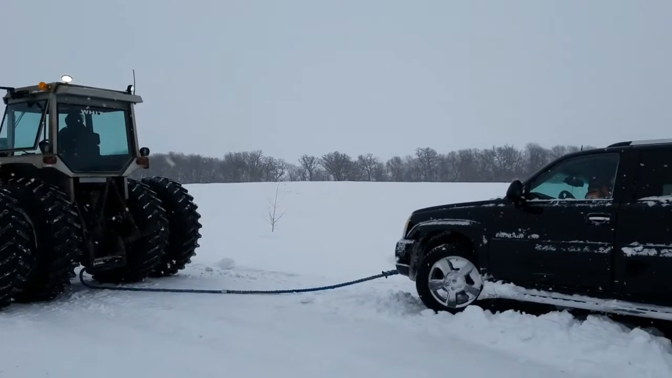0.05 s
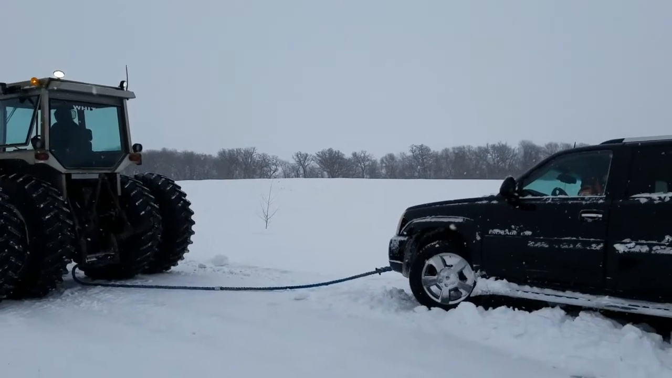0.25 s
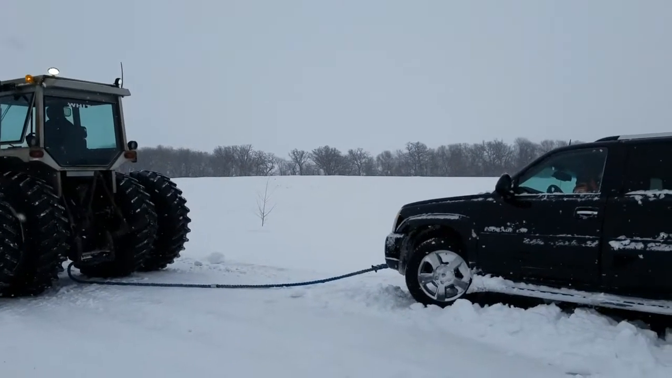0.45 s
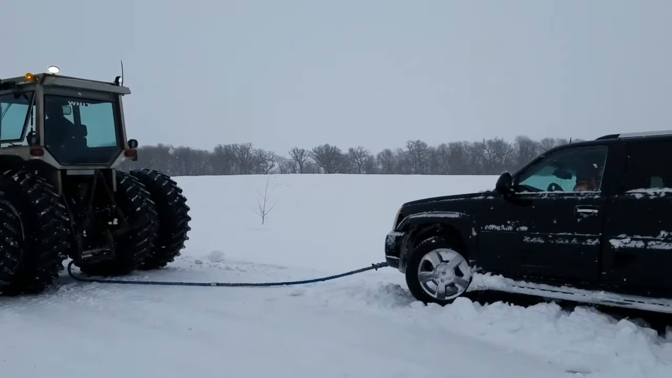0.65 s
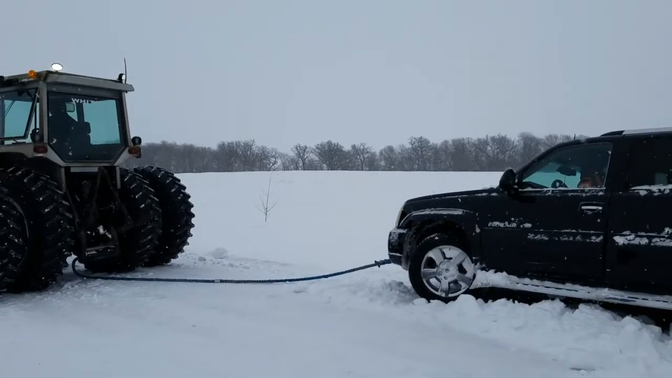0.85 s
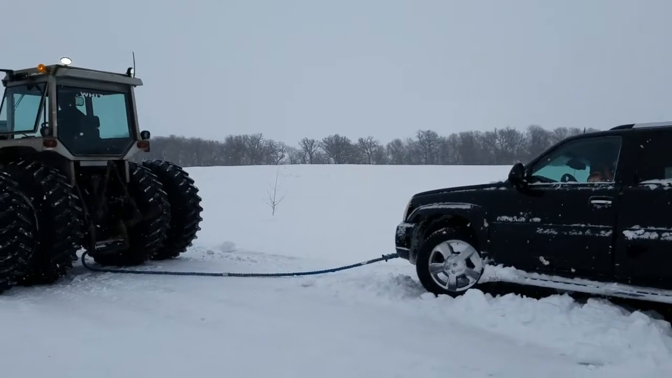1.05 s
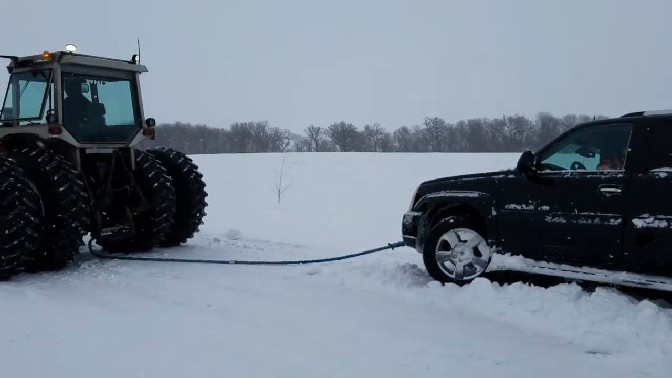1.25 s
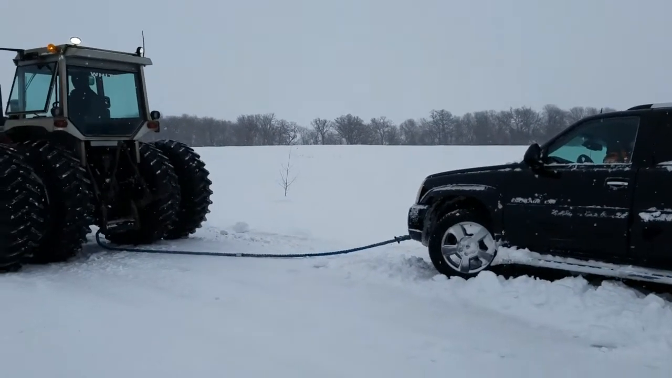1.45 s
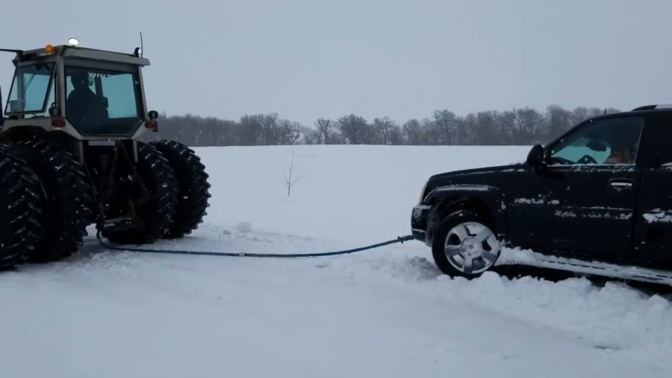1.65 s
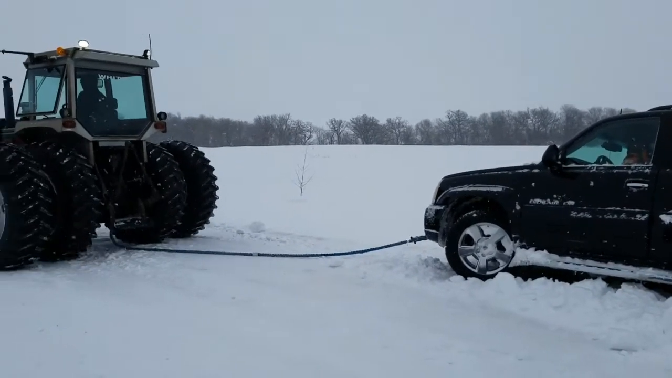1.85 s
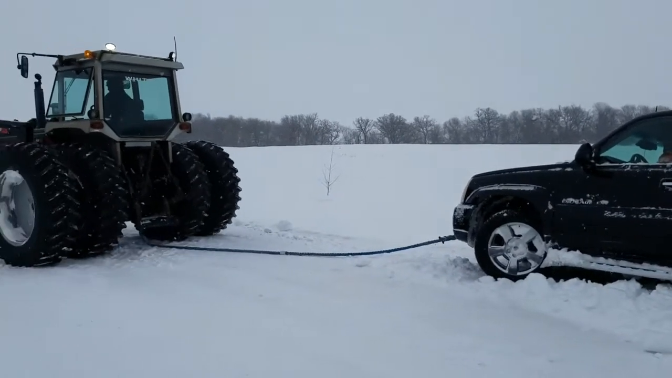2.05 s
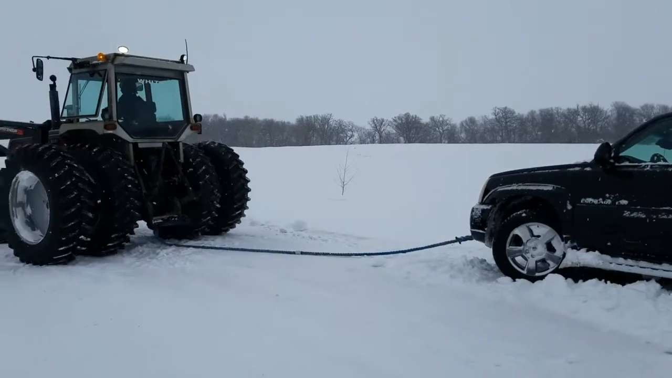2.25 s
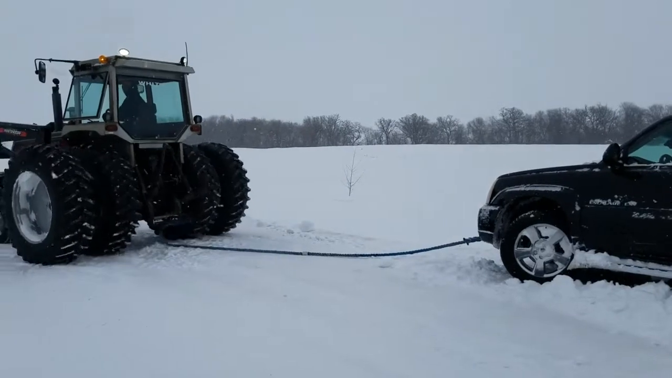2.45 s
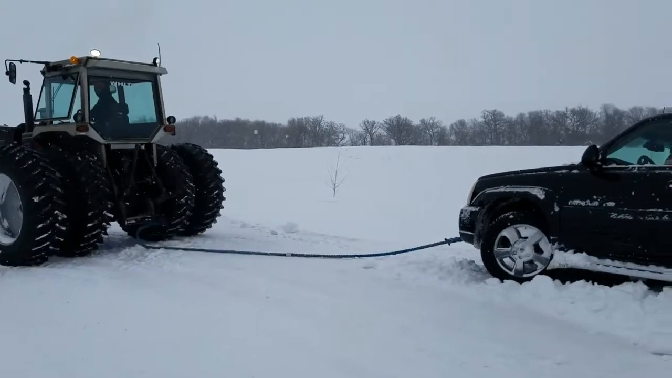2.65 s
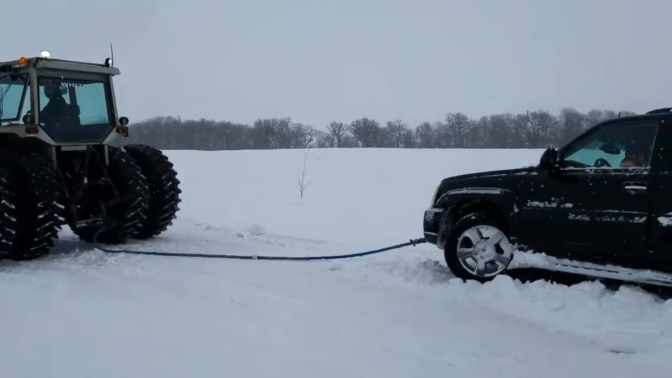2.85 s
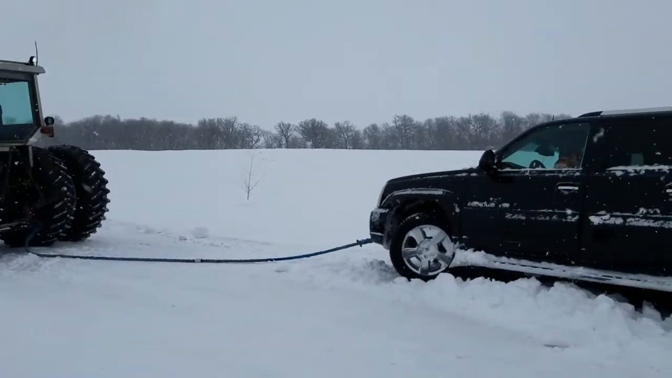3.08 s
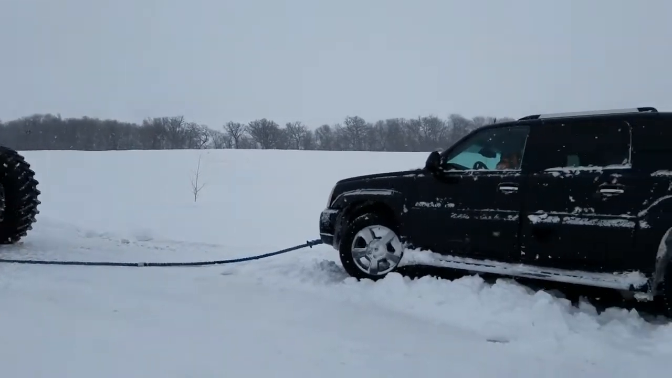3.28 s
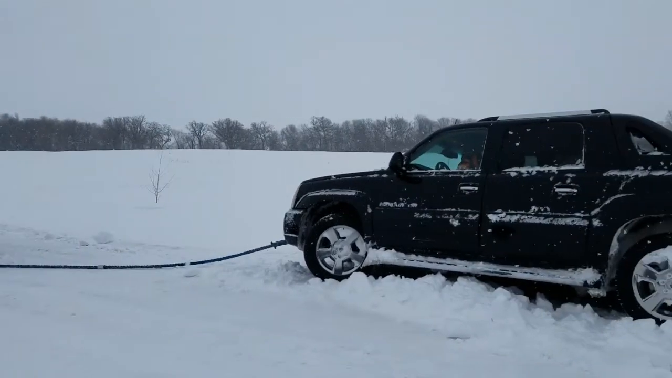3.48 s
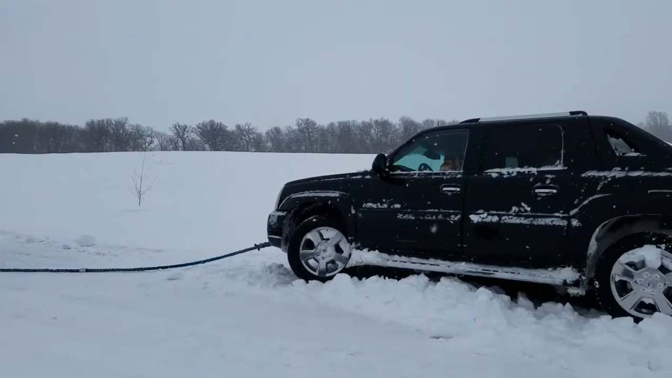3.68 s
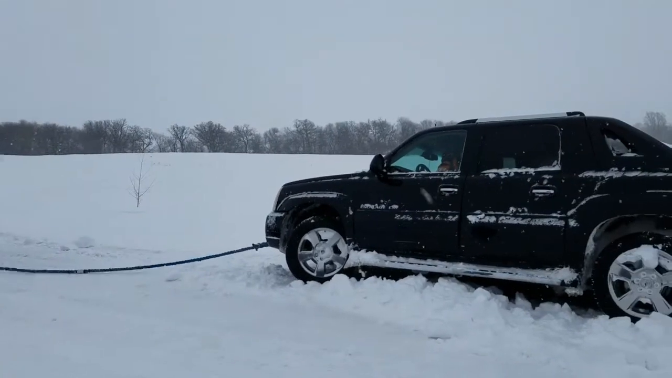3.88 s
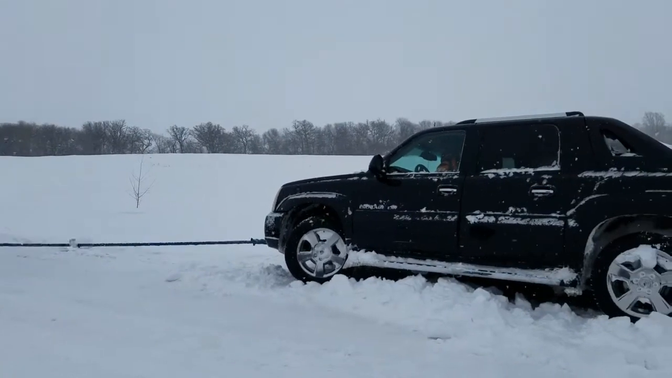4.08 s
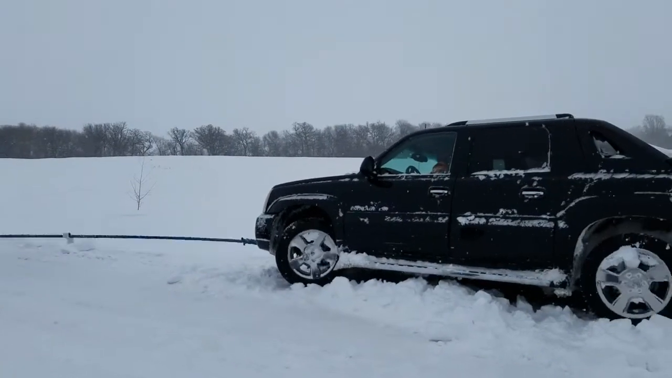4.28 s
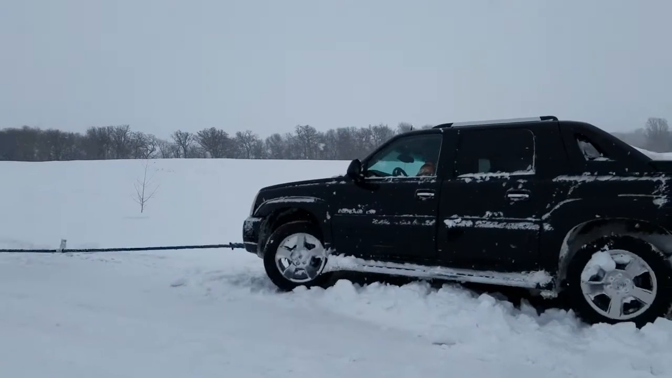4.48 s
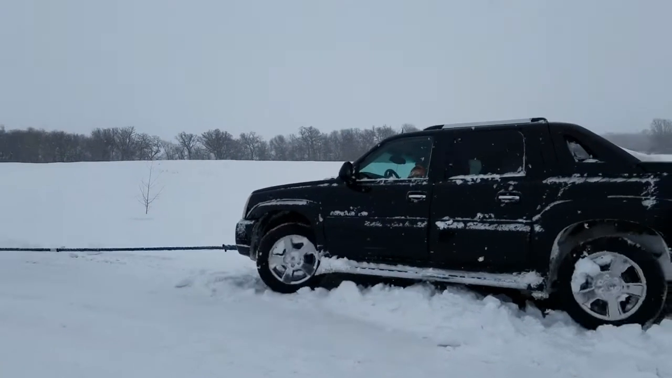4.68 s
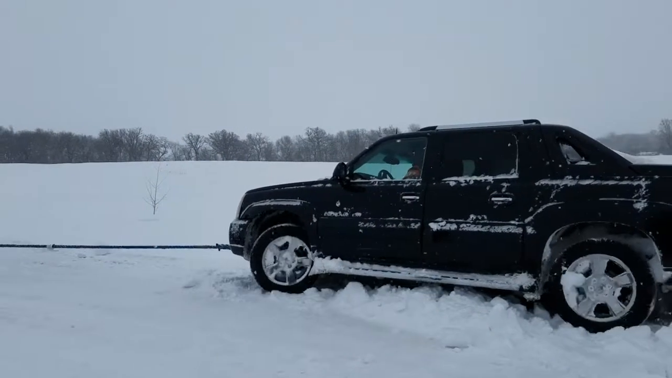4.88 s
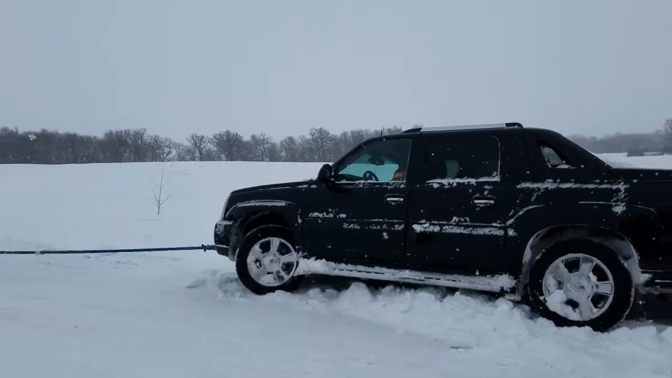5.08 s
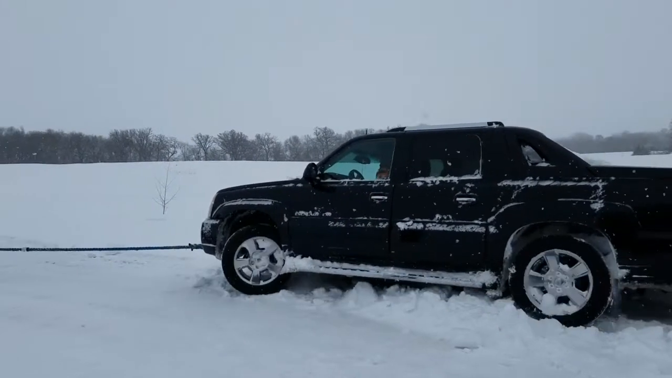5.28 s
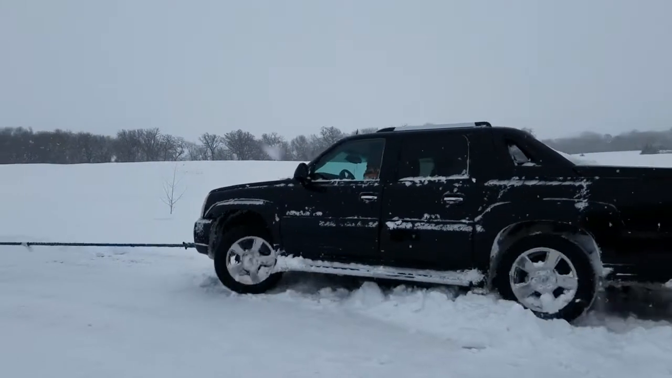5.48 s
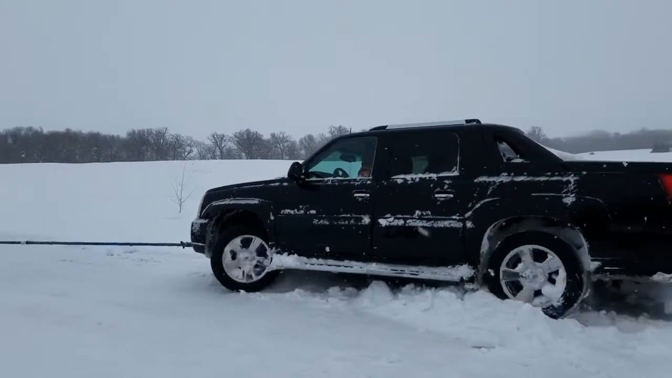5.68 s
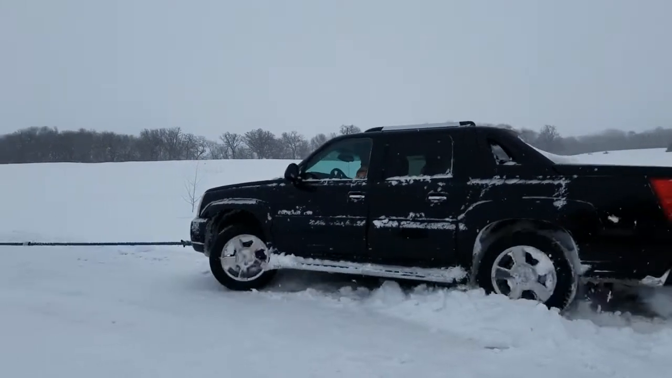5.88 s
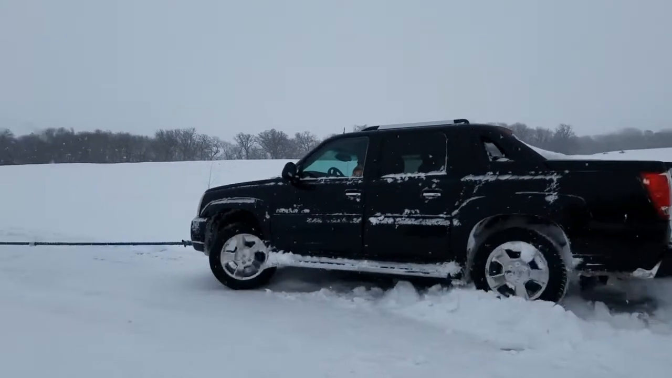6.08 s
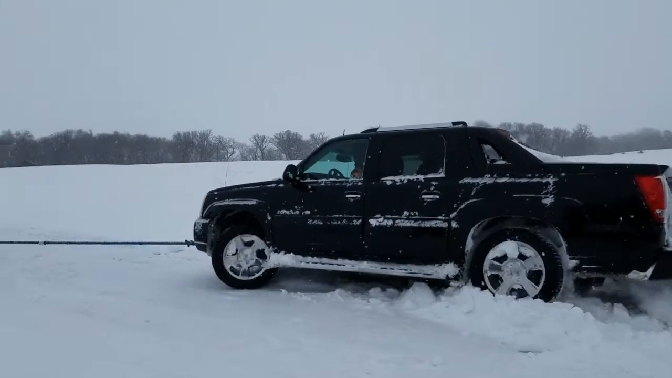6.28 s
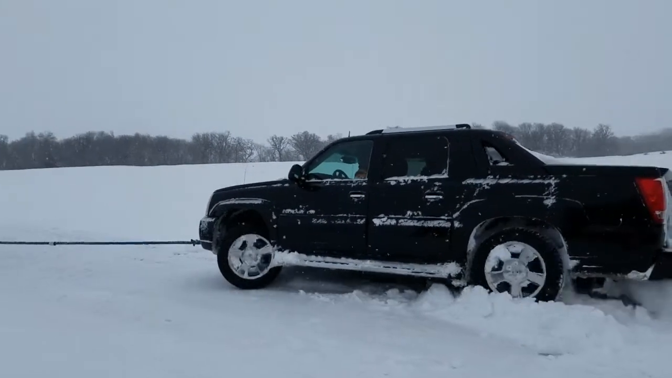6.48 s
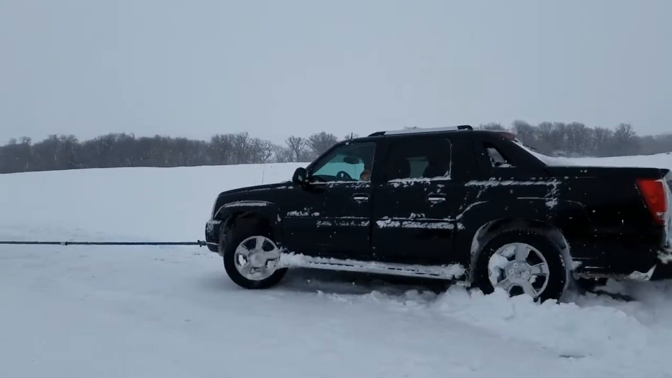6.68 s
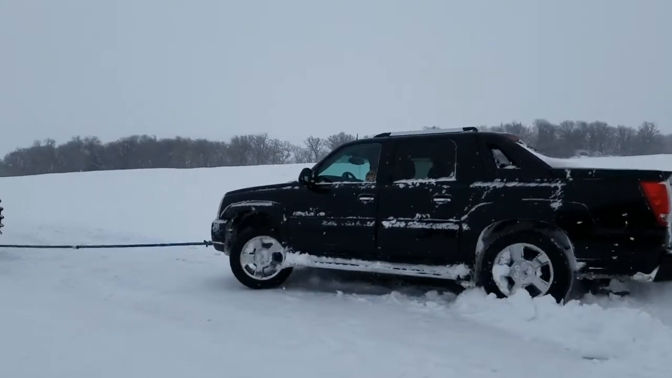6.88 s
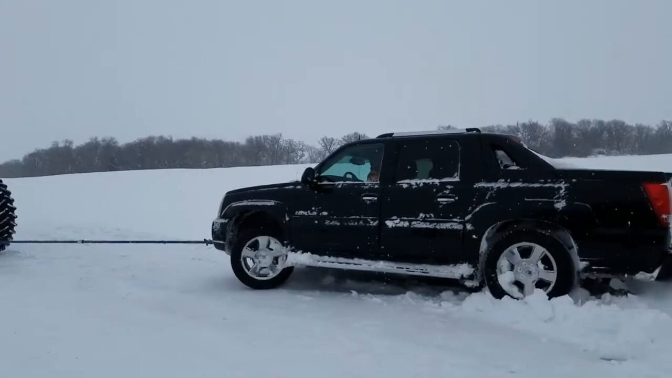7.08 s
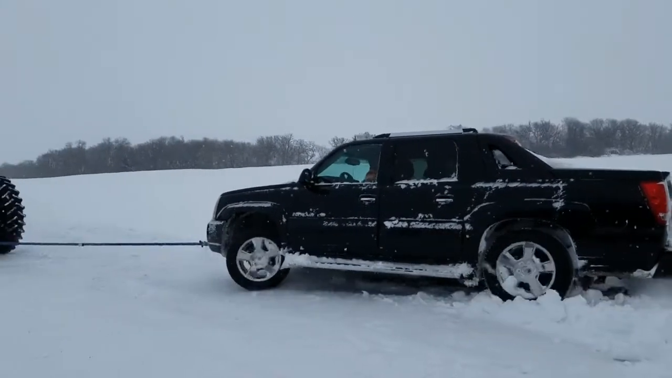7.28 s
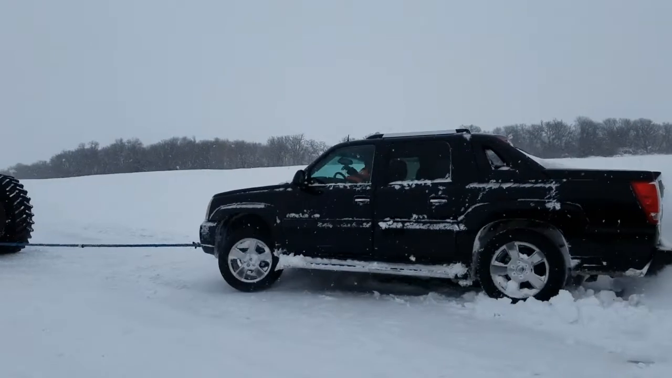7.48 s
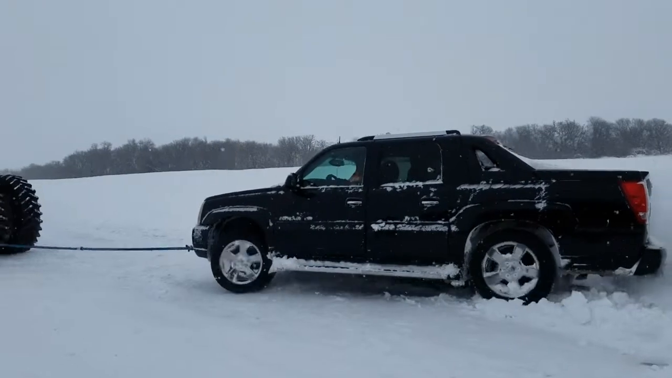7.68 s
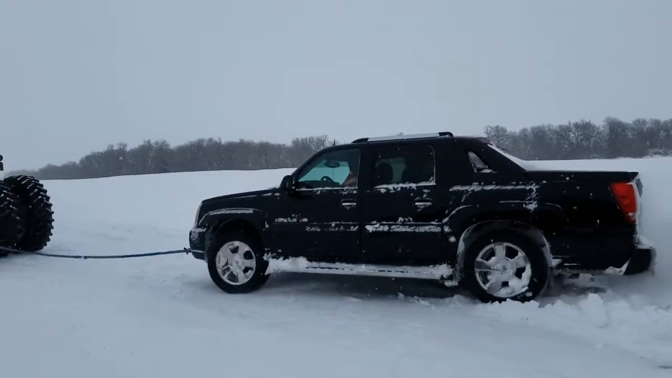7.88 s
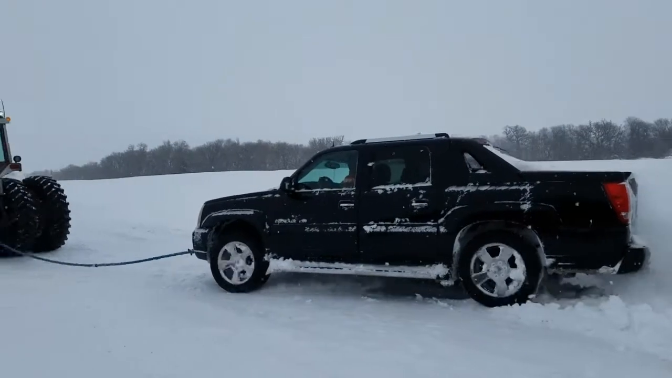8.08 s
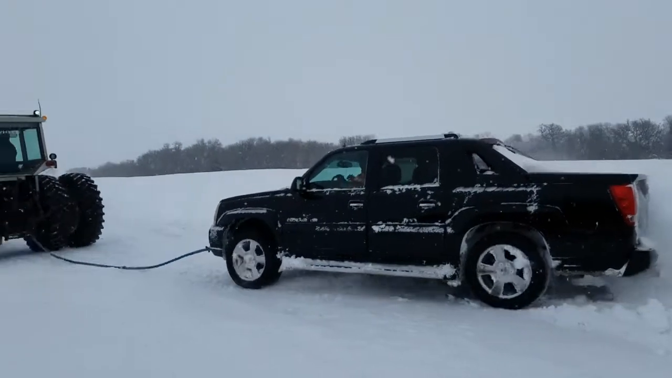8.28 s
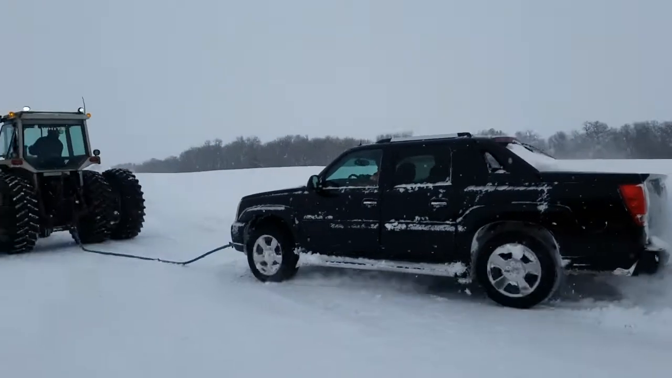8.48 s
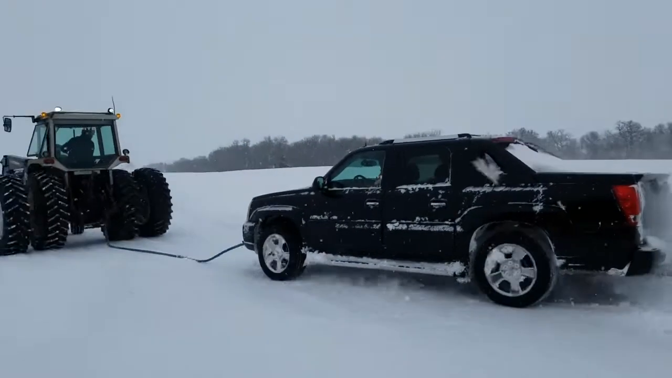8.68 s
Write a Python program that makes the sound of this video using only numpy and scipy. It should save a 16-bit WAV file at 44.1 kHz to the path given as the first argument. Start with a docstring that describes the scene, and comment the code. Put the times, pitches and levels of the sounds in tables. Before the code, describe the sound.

Open field, dry air, handheld stereo microphone. From 0 s a tractor diesel on the left idles unevenly, with dull knocking, metallic injector ticks and faint belt whine. At 1.2 s snow starts churning, with a cluster of low soft thuds and crunches, more lumps until 2.7 s, and a weak low pickup hum rising on the right from about 2 s. Around 3.2-3.6 s the tractor climbs to a faster, heavier growl. Small treble scrapes and sharp ticks sit near the microphone, mostly 4-5.2 s. At 4.5-4.9 s the pickup jumps to a working drone with lumpy rasp, metal rattle and gassy puffs. From 6.6 s it strains much louder, revving to a peak at 7.5 s, with rough moans following its pitch. It then falls back as the tractor gets louder at 8 s; thin hoarse squeals and a low rising tone colour the slowing end at 8.7 s.

```python
"""A pickup's eight-cylinder exhaust drones, rasps and revs up on the right, towed out of deep snow by a tractor.
The drone is a sum of cycle harmonics; rasp and rattle are firing pulses that excite resonances, with noisy gas puffs.
The tractor, an eight-cylinder diesel on the left, adds harmonics, noise knocks, injector ticks and a belt whine.
Churned snow is coloured grains with sine thuds; hiss, scrapes and ticks are treble noise near the listener.
Moans ride on engine speed late on, among brief gliding squeals, groans and a low rising engine tone."""
import sys
import numpy as np
from scipy import signal
from scipy.fft import rfft, irfft, next_fast_len
from scipy.io import wavfile
from scipy.ndimage import uniform_filter1d

SR = 44100
rng = np.random.default_rng(int(sys.argv[2]) if len(sys.argv) > 2 else 0)


def unload_audio(sound):
    """Save the sound as a 16-bit wav file, at the path given as the first command line argument."""
    columns = np.transpose(np.atleast_2d(sound))
    # keep every value between -1 and 1, then stretch to whole-number steps
    steps = np.round(np.clip(columns, -1, 1) * 32767)
    wavfile.write(sys.argv[1], SR, steps.astype(np.int16))


N = 385434


def undb(db):
    """Decibel law: the amplitude gain of a level in dB."""
    return np.exp(np.asarray(db) * (np.log(10) / 20))


def curves(table):
    """Linear interpolation: every column of a table after time, as a value per sample."""
    s, *columns = np.transpose(table)
    return [np.interp(np.arange(N) / SR, s, c) for c in columns]


def ramp(start, length):
    """Linear onset: 0 before start, rising evenly to 1 over length s."""
    return np.clip((np.arange(N) / SR - start) / length, 0, 1)


def summed(*dbs):
    """Power addition: the gain of unrelated levels in dB heard together."""
    return np.sqrt(sum(undb(db) ** 2 for db in dbs))


def unit(x):
    """Normalisation to an rms of 1."""
    return x / np.sqrt(np.mean(x ** 2))


def shape(hz, points):
    """Frequency response interpolated in dB over log frequency from (frequency [Hz], level [dB]) points."""
    f, db = np.transpose(points)
    return undb(np.interp(np.log(hz + 1), np.log(f), db))


def colour(x, points):
    """Spectral shaping: multiply the spectrum by the response through the points."""
    size = next_fast_len(N)
    f = np.arange(size // 2 + 1) * SR / size
    return irfft(rfft(x, size) * shape(f, points), size)[:N]


def ring(x, hz, width_hz):
    """Second-order resonance with gain 1 at its centre."""
    return signal.lfilter(*signal.iirpeak(hz, hz / width_hz, SR), x + 1e-18)


def walk(rate):
    """Band-limited fluctuation: random values, one every 1 / rate s, joined by straight lines."""
    at = np.arange(N) * (rate / SR)
    knots = np.arange(int(at[-1]) + 2)
    return 1.14 * np.interp(at, knots, rng.standard_normal(len(knots)))


PORT_LAG_S = 0.00023


def place(make, side, spread):
    """Time-difference panning: the near port leads (side -1 left, +1 right); unrelated scatter widens it."""
    direct, lag = make(), int(PORT_LAG_S * SR)
    late = np.concatenate([np.zeros(lag), direct[:N - lag]])
    pair = np.array([late, direct] if side > 0 else [direct, late])
    if spread:
        pair = pair + spread * np.array([make(), make()])
    return pair / np.sqrt(1 + spread ** 2)


def strike(pulses, firing, modes, scatter_db, detune):
    """Impulse excitation of modes that swell and fade; strength, sign and pitch vary from firing to firing."""
    first = firing[0]
    draws = rng.standard_normal(size=(firing[-1] - first + 1, len(modes), 3))
    chance = draws.transpose(1, 2, 0)[:, :, firing - first]
    out = 0
    for (size, sign, pitch), (f, w, db) in zip(chance, modes):
        blows = pulses * undb(db + scatter_db * size) * np.sign(sign) / np.sqrt(w)
        pitch_step = np.clip(np.round(pitch), -1, 1)
        for step in (-1, 0, 1):  # flat, true, sharp
            hz = f * (1 + detune * step)
            rung = blows * (pitch_step == step)
            for _ in range(3):
                rung = ring(rung, hz, w)
            out = out + rung
    return unit(out)


# tractor engine: (time [s], firing rate [Hz], exhaust level [dB], clatter level [dB])
TRACTOR = [(0, 44.75, -31, -34.5), (1.45, 45.1, -32, -34.5), (1.7, 43.7, -32, -33.5),
           (3.15, 44.5, -34, -34), (3.6, 67.3, -25, -29), (4.12, 62.7, -24.5, -29), (4.6, 66, -25, -29),
           (5.1, 63, -30, -30), (6.4, 63, -28, -30.5), (8.0, 64.65, -21, -24.5), (8.74, 63.73, -20, -29.5)]
# tractor exhaust lines: (multiple of the cycle [-], level idling [dB], level pulling [dB])
TRACTOR_ORDERS = [(8, -17, 0.5), (11, -13, -6.5), (13, -12, -6.5), (16, -1.9, -3), (17, -10.5, -13.5),
                  (19, -16, -5.5), (21, -7.5, -17.5), (24, -5, -11), (27, -12, -22), (29, -16.5, -16),
                  (32, -20, -12.5)]
# spectrum of the diesel knock: (frequency [Hz], relative density [dB per Hz])
CLATTER = [(30, -43.5), (75, -14), (110, -13), (183, -16), (450, -26.5), (800, -28.5), (1190, -35),
           (2600, -37.5), (3500, -52), (8000, -65.5), (15500, -81.5)]
# injector resonances: (frequency [Hz], width of each resonance pass [Hz], relative level [dB])
INJECTOR_MODES = [(2285, 400, 7), (2775, 490, -4), (4090, 530, -16)]
# belt whine at idle: (frequency [Hz], mean level [dB])
WHINE = [(274.5, -48), (560, -51.5), (786, -49.5)]
FIRST_FIRING = 8.15  # place in the firing order at the start
EXHAUST_LAG = 0.55  # exhaust beat after the injector tick, in firings
QUIET_CYLINDER_DB = -9  # injector tick of the five cylinders between the three loud ones
INJECTOR_DB = -15.5  # against the clatter, at idle


def tractor():
    """Harmonic synthesis of an uneven firing order, with noise knock, resonant injector ticks and belt whine."""
    hz, exhaust_db, clatter_db = curves(TRACTOR)
    t = np.arange(N) / SR
    firings = FIRST_FIRING + np.cumsum(hz) / SR
    firing = firings.astype(int)
    pull = np.clip((hz - 46) / 16, 0, 1)  # inferred from the firing rate

    tone = 0
    for k, idle_db, pull_db in TRACTOR_ORDERS:
        gain = undb(idle_db + (pull_db - idle_db) * pull + 1.3 * walk(6))
        offset = (.5 + 1.52 * pull) * (k % 3)  # beats smear under load
        tone = tone + gain * np.cos(2 * np.pi * k * (firings - EXHAUST_LAG) / 8 + offset)

    firing_gain = undb(1.24 * rng.standard_normal(1000)[firing])
    knock = firing_gain * (.5 + np.exp(-(firings % 1) / 1.0))

    def clatter():
        return unit(colour(knock * rng.standard_normal(N), CLATTER))

    loud = firing % 8 % 3 == 0
    pulses = np.diff(firing, prepend=firing[0]) * undb(QUIET_CYLINDER_DB * ~loud)
    ticks = strike(pulses, firing, INJECTOR_MODES, 2.0, 0.076) * undb(clatter_db + INJECTOR_DB - 5 * pull)
    ticks = ticks + 0.95 * pull * ring(ticks, 3100, 1200)  # brighter under load

    whine = sum(undb(db + 1.5 * walk(9)) * np.sin(2 * np.pi * f * t) for f, db in WHINE)
    whine = whine * (1 - pull)
    direct = place(lambda: tone * undb(exhaust_db) + whine + ticks, -1, 0)
    return direct + place(clatter, -1, 0.93) * undb(clatter_db)


# pickup engine speed: (time [s], four-stroke cycles a second [Hz])
CYCLE = [(0, 4.07), (1.6, 4.04), (2.33, 6.86), (3.29, 7.2), (4.4, 7.5), (4.63, 8.71), (4.93, 13.65),
         (5.58, 13.07), (5.8, 14.5), (6.06, 13.24), (6.22, 14.19), (6.59, 13.51), (6.75, 15.2),
         (7.49, 20.09), (7.67, 19.13), (7.94, 15.1), (8.35, 14.52), (8.74, 8.48)]
# changes of pickup load, 0 light, 0.5 working, 1 straining: (start [s], length [s], change [-])
LOAD_STEPS = [(4.502, 0.44, 0.41), (6.562, 0.42, 0.56), (7.65, 0.32, -0.512), (8.446, 0.51, -0.14)]
LIGHT_LOAD = 0.053
STRONG_FIRING_S = 5.286  # the cycle count is zero here


def pickup_engine():
    """Phase as the integral of rate: engine speed, cycle count and load that drive the pickup's sounds."""
    hz, = curves(CYCLE)
    changes = sum(change * ramp(s, length) for s, length, change in LOAD_STEPS)
    load = np.clip(LIGHT_LOAD + changes, 0, 1)
    cycles = np.cumsum(hz) / SR
    return hz, cycles - cycles[int(STRONG_FIRING_S * SR)], load


# pickup exhaust lines: (multiple of the cycle [-], level working [dB], level straining [dB])
EXHAUST_ORDERS = [(4, -28, -11), (5, -10.5, 0.8), (6, -10.5, -7.5), (7, -10.5, -10), (8, 1, -5.5),
                  (9, -13, -2), (10, -8.5, -17.5), (11, -6, -13), (13, -11.5, -20), (14, -12.5, -34),
                  (15, -18.5, -36), (16, -9.5, -23), (17, -19, -33), (19, -27.5, -45)]
# gain of the whole drone: (time [s], level [dB])
EXHAUST = [(1.5, -49), (2.2, -32.5), (3.2, -30), (3.6, -32), (4.45, -33), (4.85, -17), (6.55, -18),
           (6.85, -9), (8.5, -10), (8.74, -16.5)]
LIGHT_LOSS_DB = -9  # all lines but the firing line, towards zero load


def pickup_drone(cycles, load):
    """Harmonic synthesis: lines of an uneven firing order reweighted by load, turbulence filling between."""
    light = np.maximum(1 - 2 * load, 0)
    strain = np.maximum(2 * load - 1, 0)
    tone = 0
    for k, working_db, strain_db in EXHAUST_ORDERS:
        db = working_db + (k != 8) * LIGHT_LOSS_DB * light + strain * (strain_db - working_db)
        tone = tone + undb(db + 1.0 * walk(7)) * np.cos(2 * np.pi * k * cycles + .6 * k * k)
    turbulence_colour = [(25, -7.0), (70, -3.0), (130, 7.5), (250, 2.5), (500, -44.0), (1000, -75.0)]
    turbulence = unit(colour(rng.standard_normal(N), turbulence_colour))
    drone = (tone + undb(-13.0) * turbulence) * undb(curves(EXHAUST)[0])
    return place(lambda: drone, 1, 0)


# spectrum of the rustle: (frequency [Hz], relative density [dB per Hz])
RUSTLE_COLOUR = [(2000, -14), (4000, -4.5), (6500, 0.5), (8900, -13), (10700, -2.5), (13000, -5.5),
                 (15700, 0)]
# scrapes near the listener: (start [s], length before the decay [s], mean level [dB])
SCRAPES = [(1.185, 0.17, -53), (2.1, 0.17, -55), (4.037, 0.14, -41.5), (4.308, 0.029, -43),
           (4.7, 0.056, -52)]
# ticks near the listener: (time [s], envelope peak level [dB])
TICKS = [(1.4879, -41), (1.518, -39), (4.0231, -38), (4.335, -27.5), (4.3832, -39), (4.4033, -36),
         (4.7695, -37), (4.983, -33), (5.1651, -32)]
SCRAPE_RISE_S, SCRAPE_T60_S, CRUNCH_DB = 0.026, 0.56, 3.5
HISS_DB, HISS_SNOW_DB, HISS_RASP_DB = -59, -26.5, -20  # base; against the churn; against the rasp
TICK_T60_S = 0.044


def rustle(rasp_db):
    """Amplitude-modulated treble noise: hiss follows churn and rasp, with scrapes and ticks near the listener."""
    t = np.arange(N) / SR
    rolling = ramp(ROLL_START_S, ROLL_RISE_S)
    swell = summed(HISS_DB, rasp_db + HISS_RASP_DB)
    swell = swell + rolling * undb(curves(SNOW)[0] + HISS_SNOW_DB)
    for s, length, db in SCRAPES:
        decay_db = 60 * np.maximum(t - s - length, 0) / SCRAPE_T60_S
        swell = swell + ramp(s, SCRAPE_RISE_S) * undb(db + CRUNCH_DB * walk(160) - decay_db)
    swell = swell * undb(2.5 * walk(40))
    for s, db in TICKS:
        swell = swell + (t >= s) * undb(db - 60 * np.abs(t - s) / TICK_T60_S)
    return place(lambda: unit(colour(rng.standard_normal(N), RUSTLE_COLOUR)), 1, 1.0) * swell


# churned snow: (time [s], level before spray and patchiness [dB])
SNOW = [(1.4, -32), (2.24, -26), (3.0, -28), (3.6, -30.5), (5.2, -28.5), (6.9, -27.5), (7.5, -42),
        (8.3, -34), (8.6, -28.5)]
# spectrum of the churn: (frequency [Hz], relative level [dB])
SNOW_COLOUR = [(110, -20.5), (200, -0.5), (300, 3.5), (500, -3.5), (850, -6.5), (1250, -22.5),
               (2500, -23.5), (6000, -45), (9000, -50)]
# lumps breaking under the tyres: (time [s], approximate envelope peak [dB], thud frequency [Hz])
LUMPS = [(1.2, -21, 348), (1.203, -23.5, 640), (1.283, -18, 270), (1.318, -16.5, 241), (1.3, -19.5, 310),
         (1.827, -27, 330), (1.873, -21.5, 422), (2.226, -20.5, 640), (2.342, -28, 607), (2.718, -18, 202)]
ROLL_START_S, ROLL_RISE_S = 1.2, 0.09
SPRAY_DB, SPRAY_T60_S = -8.5, 0.25  # loose snow thrown by a lump, against the lump's level


def snow():
    """Granular noise of snow packed and broken by tyres: dense dull grains, and lumps that thud and spray."""
    def churn():
        strength = undb(3.05 * np.minimum(rng.exponential(size=N), 3.5))
        grains = (rng.random(N) < 900 / SR) * strength * rng.standard_normal(N)  # about 900 a second
        return unit(colour(unit(grains) + 1.07 * rng.standard_normal(N), SNOW_COLOUR))

    lump_table = np.array(LUMPS)
    since = np.arange(N) / SR - lump_table[:, :1]
    spray_db = lump_table[:, 1:2] + SPRAY_DB - 60 * since / SPRAY_T60_S
    spray_db = np.where(since > 0, spray_db, -np.inf)
    patchy = summed(curves(SNOW)[0], *spray_db) * undb(0.88 * walk(25)) * ramp(ROLL_START_S, ROLL_RISE_S)

    lumps = np.zeros(N)
    t = np.arange(int(.06 * SR)) / SR
    envelope = t / 0.0051 * np.exp(1 - t / 0.0047)
    for s, db, hz in LUMPS:
        lumps[int(s * SR):][:len(t)] += undb(db) * envelope * np.sin(2 * np.pi * hz * t)
    return place(churn, -1, 0.65) * patchy + place(lambda: lumps, -1, 0)


RASP_LIGHT_DB, RASP_WORKING_DB = -47, -26.5  # tailpipe, before bark, coasting and fade
RATTLE_LIGHT_DB, RATTLE_WORKING_DB = -47, -37.5  # sheet metal, before coasting and fade
BARK_DB_PER_HZ_S = 0.3074  # rasp gained while the engine speeds up
COAST_HZ_S, RASP_COAST_DB, RATTLE_COAST_DB = 14, -1.5, -22  # throttle shut: speed falls this fast
TURNS_AWAY_S, RASP_FADE_DB_S, RATTLE_FADE_DB_S = 6.25, -3, -6.5


def rasp_levels(hz, load):
    """Load dependence: rasp and rattle (dB) wake with load, drop in coasting, fade as the tailpipe turns away."""
    change = uniform_filter1d(np.gradient(hz) * SR, size=4001)
    working = np.minimum(2 * load, 1)
    coasting = np.clip(-change / COAST_HZ_S, 0, 1) ** 2
    away_s = np.maximum(np.arange(N) / SR - TURNS_AWAY_S, 0)
    rasp_db = (RASP_LIGHT_DB + (RASP_WORKING_DB - RASP_LIGHT_DB) * working
               + BARK_DB_PER_HZ_S * np.maximum(change, 0)
               + RASP_COAST_DB * coasting + RASP_FADE_DB_S * away_s)
    rattle_db = (RATTLE_LIGHT_DB + (RATTLE_WORKING_DB - RATTLE_LIGHT_DB) * working
                 + RATTLE_COAST_DB * coasting + RATTLE_FADE_DB_S * away_s)
    return rasp_db, rattle_db


LOW_RASP_GONE_S, LOW_RASP_LOSS = 6.63, 0.83  # start of the fade; share finally lost


def thin(x):
    """Resonance subtraction: take a growing share out of the lower tailpipe mode."""
    return x - LOW_RASP_LOSS * ramp(LOW_RASP_GONE_S, 0.39) * ring(x, *RASP_MODES[0][:2])


# tailpipe resonances: (frequency [Hz], width of each resonance pass [Hz], relative level [dB])
RASP_MODES = [(946, 265, 3.5), (1625, 330, -4)]
# sheet-metal resonances: (frequency [Hz], width of each resonance pass [Hz], relative level [dB])
RATTLE_MODES = [(2900, 210, 2.5), (3390, 320, -1.5), (4090, 370, -3), (4810, 350, -14)]
# snap of each cylinder in firing order: (relative level [dB])
CYLINDERS_DB = [0, -15, -15, -3.5, -14, -5, -11, -12]
# the same once the engine revs: (relative level [dB])
REVVING_DB = [0, -16, -16, 0, -12, -1, 0, -13]
# spectrum of the gas puffs: (frequency [Hz], relative density [dB per Hz])
GAS = [(400, -21), (700, -24.5), (950, 0.5), (1270, -7), (1610, -0.5), (2070, -11.5), (2500, -10),
       (4070, -22), (5000, -21.5), (8800, -33.5), (11000, -68)]
REVS_S = 6.78
LATE_CYLINDER, LATE_SHARE = 3, 0.3  # one snap arrives late, by this share of a firing
UPPER_EVEN_DB = 4  # the upper mode hears weaker cylinders this much closer to the strongest, at most level
GAS_DB = -30  # while working, before the swell
GAS_SWELL_S, GAS_SWELL_DB = 5.5, 2  # the puffs thicken as the pull goes on
BUZZ_SHARE = 0.76  # buzz of the sheet metal against its blows


def pickup_rasp(cycles, rasp_db, rattle_db):
    """Impulse excitation: uneven firings snap the tailpipe and rattle the sheet metal; gas puffs follow."""
    phase = 8 * cycles % 1  # since the last firing
    firing = np.floor(8 * cycles).astype(int)
    firing = firing - ((firing % 8 == LATE_CYLINDER) & (phase < LATE_SHARE))
    beats = np.diff(firing, prepend=firing[0])
    revving = ramp(REVS_S, 0.41)
    cylinder = firing % 8
    size_db = (1 - revving) * np.array(CYLINDERS_DB)[cylinder] + revving * np.array(REVVING_DB)[cylinder]

    low, upper = RASP_MODES
    low_snaps = strike(beats * undb(size_db), firing, [low], 1.3, 0.054)
    upper_size_db = np.minimum(size_db + UPPER_EVEN_DB, 0)
    upper_snaps = strike(beats * undb(upper_size_db), firing, [upper], 2.2, 0.057)
    snaps = (low_snaps + upper_snaps * undb(upper[2] - low[2])) * undb(rasp_db)

    blows = strike(beats * undb((0.4 + 0.29 * revving) * size_db), firing, RATTLE_MODES, 3.5, 0.036)
    puff = undb((0.43 + 0.065 * revving) * size_db) * (0.28 + np.exp(-phase / 0.42))
    puff = uniform_filter1d(puff, size=181)
    buzz = 0
    for f, w, db in RATTLE_MODES:
        buzz = buzz + undb(db) * ring(ring(puff * rng.standard_normal(N), f, w), f, w)
    rattle = (blows + BUZZ_SHARE * unit(buzz)) * undb(rattle_db - 3)

    def gas():
        return thin(unit(colour(puff * rng.standard_normal(N), GAS)))

    gas_db = (GAS_DB + GAS_SWELL_DB * ramp(GAS_SWELL_S, 0.27)
              + 0.63 * (rasp_db - RASP_WORKING_DB) + 0.32 * (rattle_db - RATTLE_WORKING_DB))
    both = place(lambda: thin(snaps) + rattle, 1, 0) + place(gas, 1, 1.0) * undb(gas_db)
    return ramp(2.87, 0.97) * both


# squeals, groans and a low rising engine tone:
# (start [s], end [s], start frequency [Hz], end frequency [Hz], relative level [dB])
SQUEALS = [(7.76, 8.05, 2920, 2860, -39), (7.82, 8.0, 2650, 2780, -40), (6.37, 6.5, 670, 750, -26),
           (7.5, 8.4, 2440, 2380, -41), (8.441, 8.683, 275, 331, -33), (8.54, 8.65, 2310, 2300, -37),
           (8.6, 8.71, 2170, 2110, -35), (8.58, 8.8, 2620, 2400, -36)]
SQUEAL_NOISE_HZ = 90  # random amplitude values a second


def squeals():
    """Noise-modulated glides: hoarse, wavering squeals, groans and a low rising engine tone, late in the pull."""
    t, out = np.arange(N) / SR, 0
    for start, end, hz0, hz1, db in SQUEALS:
        hz = np.interp(t, [start, end], [hz0, hz1]) * (1 + 0.012 * walk(40))
        swell = np.sin(np.pi * np.clip((t - start) / (end - start), 0, 1))
        hoarse = np.tanh(2 * walk(SQUEAL_NOISE_HZ))
        out = out + undb(db) * hoarse * swell * np.sin(2 * np.pi * np.cumsum(hz) / SR)
    return place(lambda: out, 1, 0)


# rough tones on engine speed, through the rev and just after it:
# (multiple of the cycle [-], random values a second [Hz], rise start [s], fall start [s], relative level [dB])
MOANS = [(32.5, 45, 6.65, 7.85, -34.5), (62, 90, 6.5, 6.9, -30), (63, 260, 7.9, 8.22, -31)]
MOAN_SWELL_S = 0.18
MOAN_LAG_S = .08  # they follow engine speed this late


def moans(cycles):
    """Narrow-band noise on a carrier: rough tones that trail the pickup's engine speed."""
    late_cycles = np.interp(np.arange(N) - MOAN_LAG_S * SR, np.arange(N), cycles)

    def tones():
        out = 0
        for k, noise_hz, s, end, db in MOANS:
            swell = ramp(s, MOAN_SWELL_S) - ramp(end, MOAN_SWELL_S)
            out = out + undb(db) * swell * walk(noise_hz) * np.cos(2 * np.pi * k * late_cycles)
        return out
    return place(tones, 1, 0.29)


def scene():
    """Superposition of both engines, the snow, the squeals and the rustle."""
    hz, cycles, load = pickup_engine()
    rasp_db, rattle_db = rasp_levels(hz, load)
    pickup = pickup_drone(cycles, load) + pickup_rasp(cycles, rasp_db, rattle_db) + moans(cycles)
    return tractor() + pickup + rustle(rasp_db) + snow() + squeals()


# response of the left port, inverted for the right: (frequency [Hz], level [dB])
LEFT_PORT = [(380, -0.78), (700, 0.4), (1800, 3), (4400, 2), (15000, 1)]
TOP_HZ = 15800


def record(dry):
    """Port response and saturation: left brighter, right fuller; loud peaks are rounded and the top is cut."""
    right_port = [(f, -db) for f, db in LEFT_PORT]
    ports = np.array([colour(dry[0], LEFT_PORT), colour(dry[1], right_port)])
    rounded = 1.5 * np.tanh(ports / 1.5)
    return signal.sosfilt(signal.ellip(10, .2, 80, TOP_HZ, fs=SR, output="sos"), rounded)


dry = scene()
out = record(dry)
unload_audio(out)
```